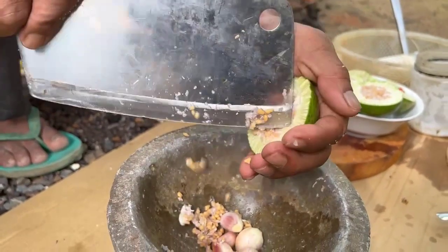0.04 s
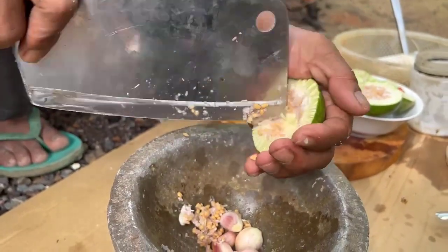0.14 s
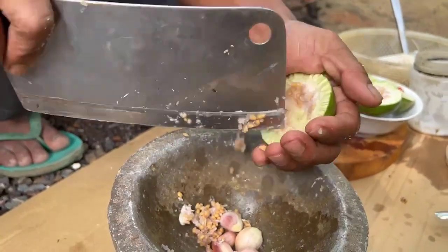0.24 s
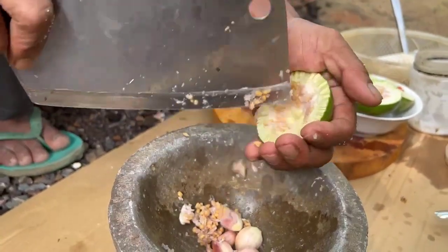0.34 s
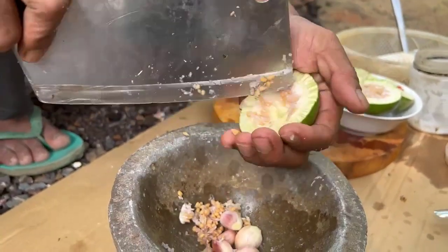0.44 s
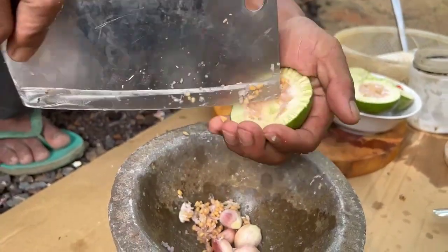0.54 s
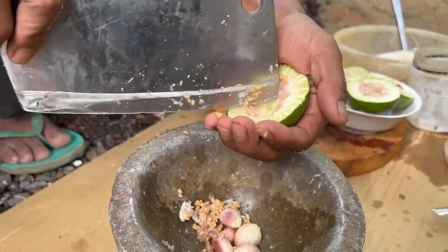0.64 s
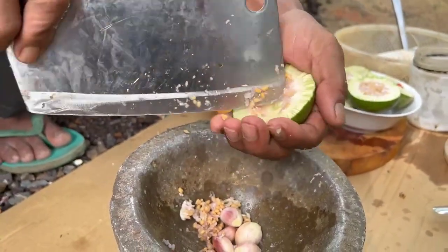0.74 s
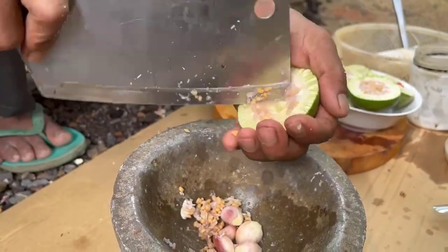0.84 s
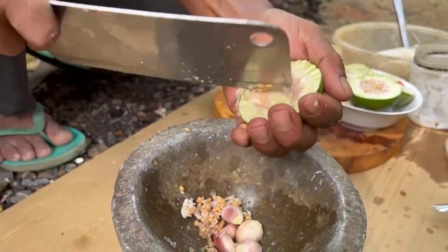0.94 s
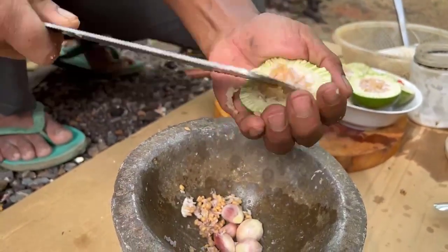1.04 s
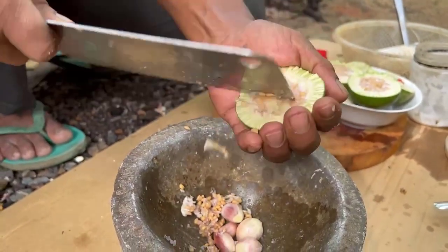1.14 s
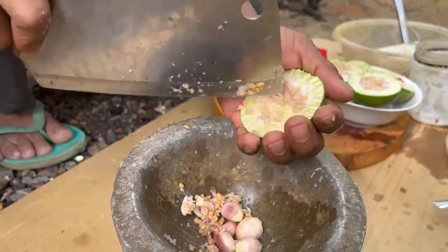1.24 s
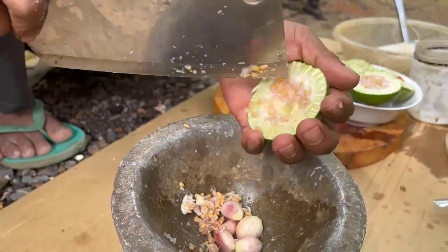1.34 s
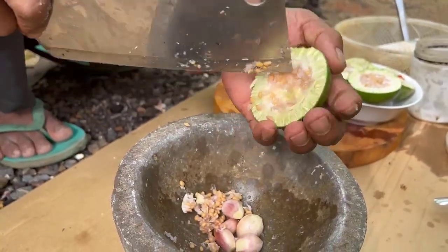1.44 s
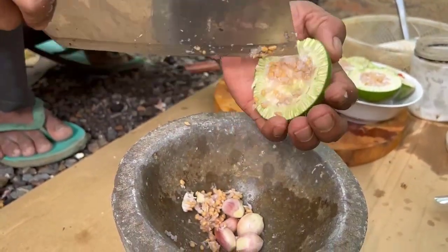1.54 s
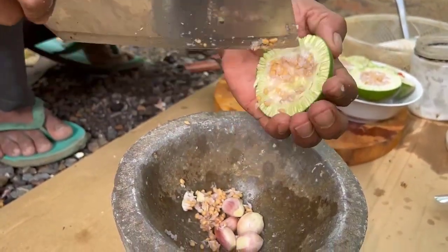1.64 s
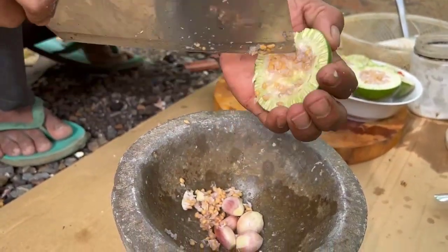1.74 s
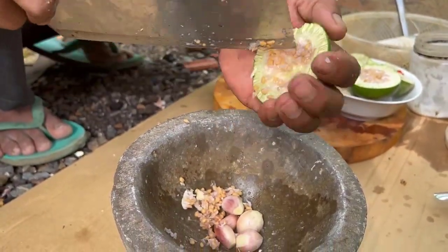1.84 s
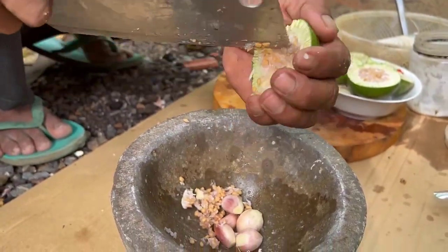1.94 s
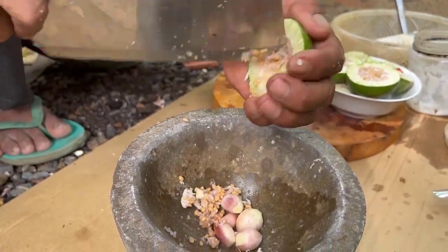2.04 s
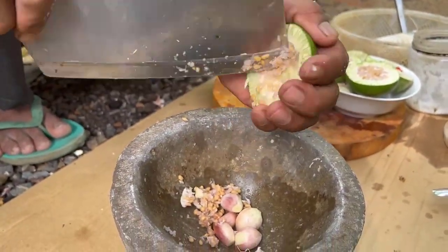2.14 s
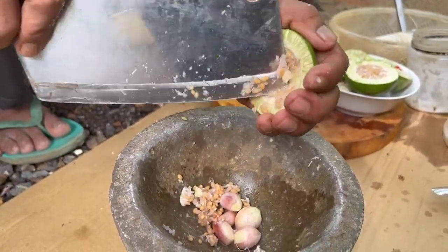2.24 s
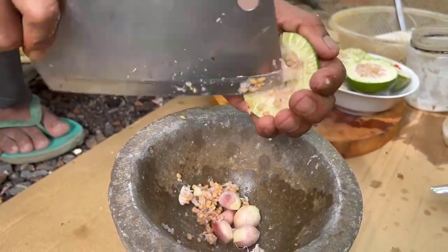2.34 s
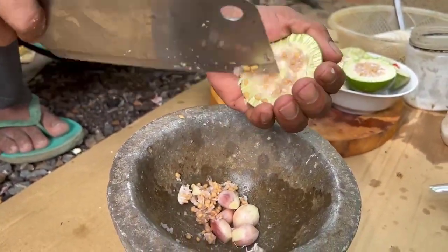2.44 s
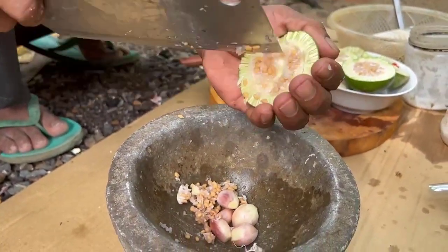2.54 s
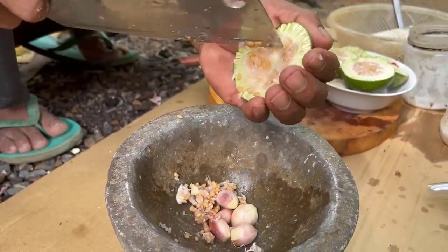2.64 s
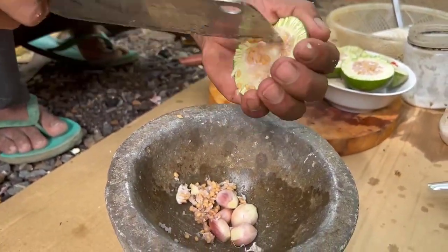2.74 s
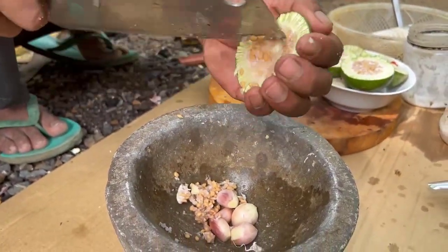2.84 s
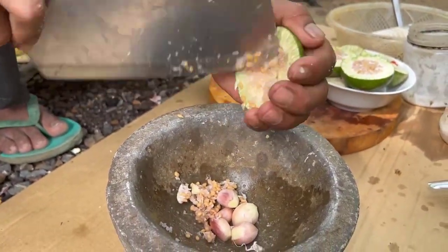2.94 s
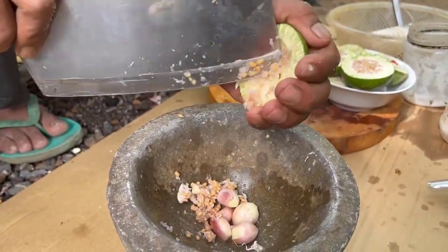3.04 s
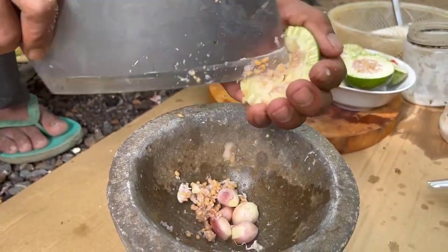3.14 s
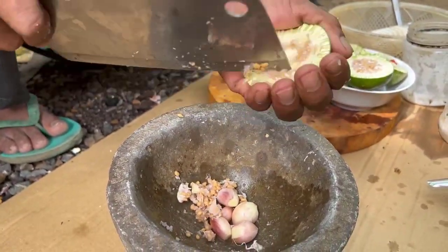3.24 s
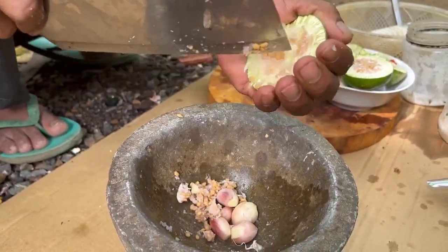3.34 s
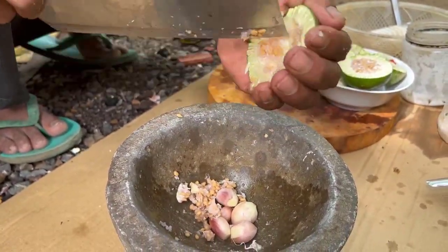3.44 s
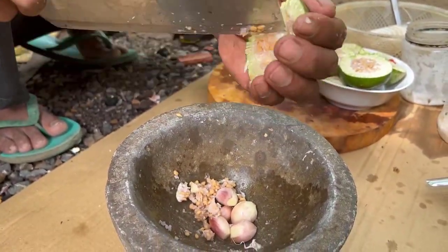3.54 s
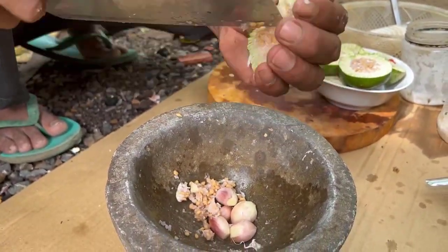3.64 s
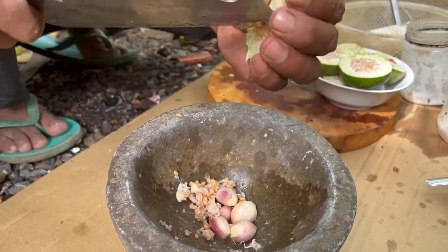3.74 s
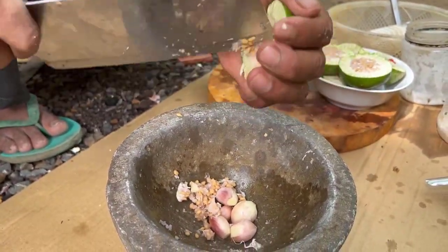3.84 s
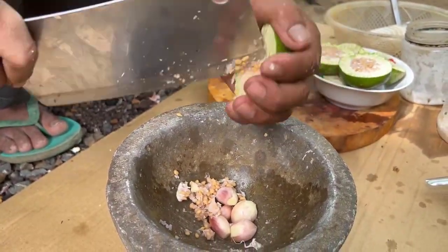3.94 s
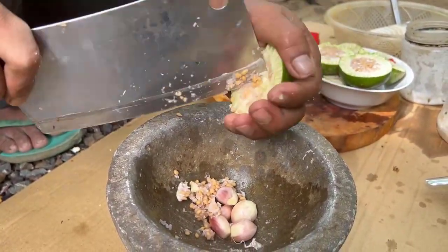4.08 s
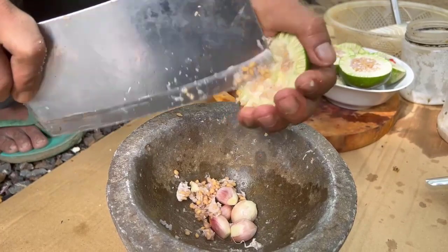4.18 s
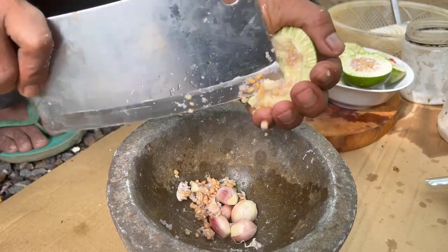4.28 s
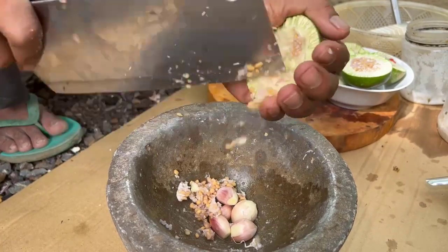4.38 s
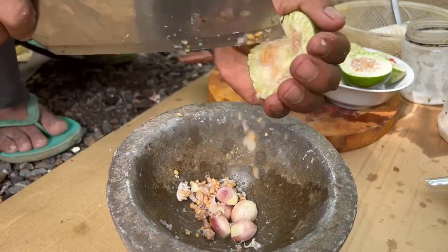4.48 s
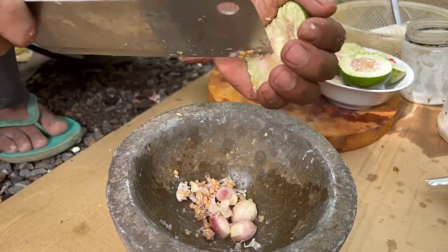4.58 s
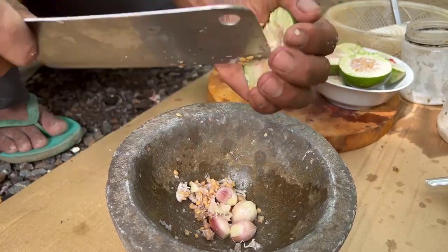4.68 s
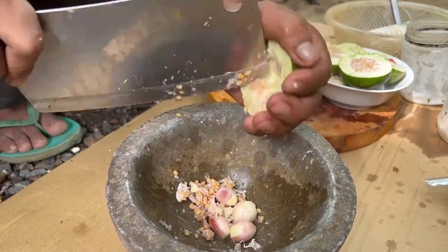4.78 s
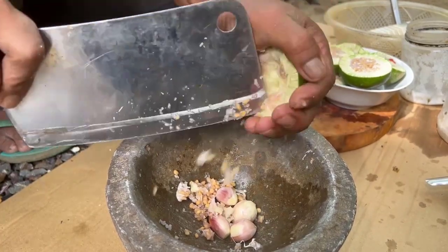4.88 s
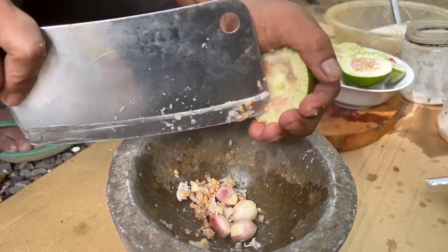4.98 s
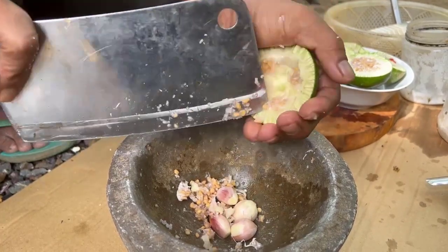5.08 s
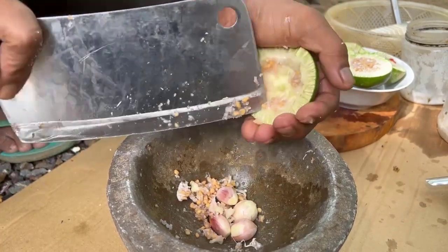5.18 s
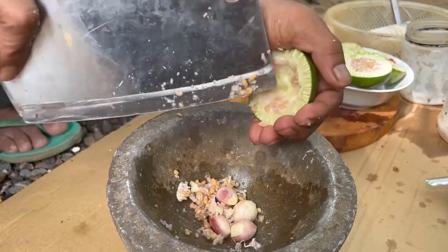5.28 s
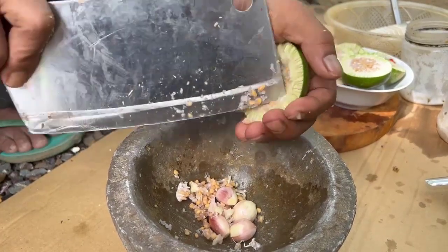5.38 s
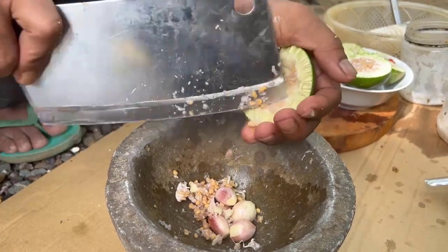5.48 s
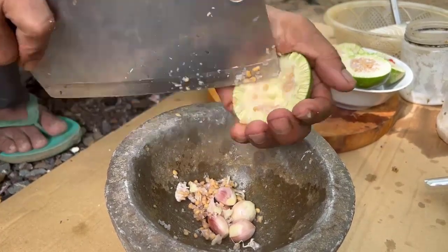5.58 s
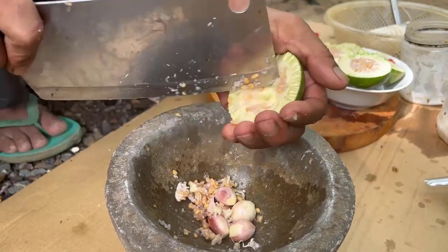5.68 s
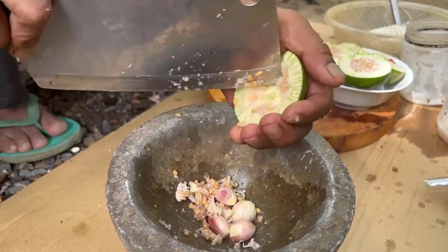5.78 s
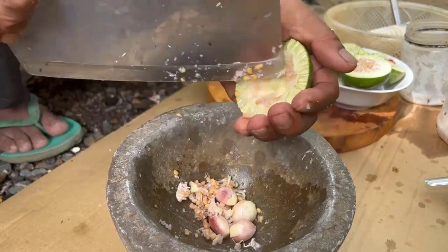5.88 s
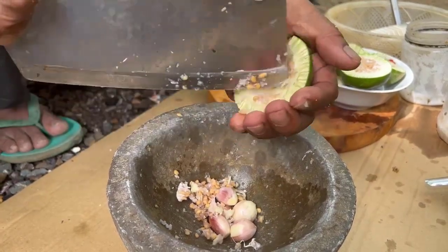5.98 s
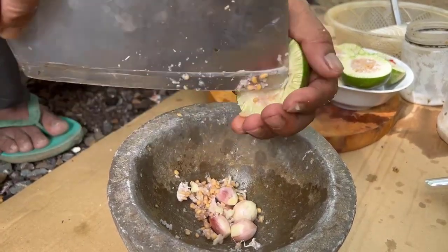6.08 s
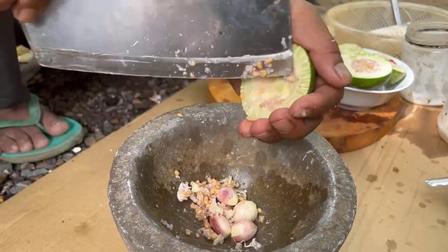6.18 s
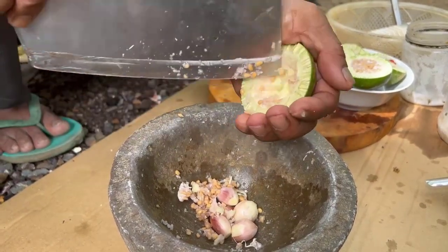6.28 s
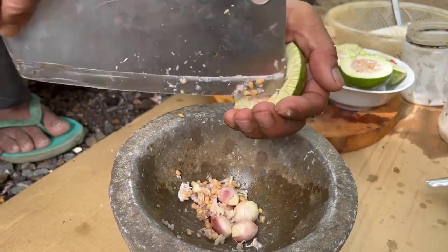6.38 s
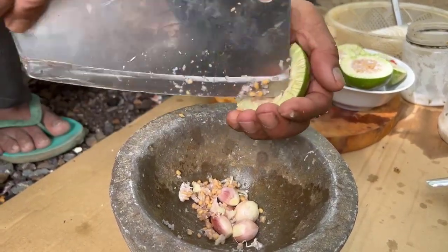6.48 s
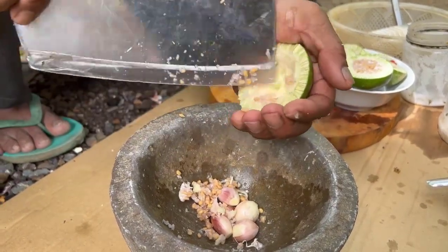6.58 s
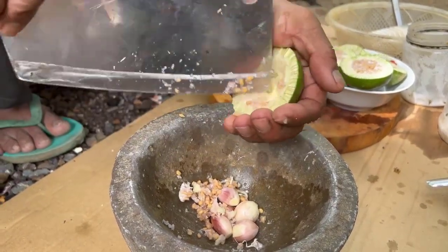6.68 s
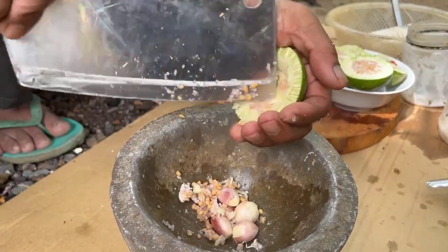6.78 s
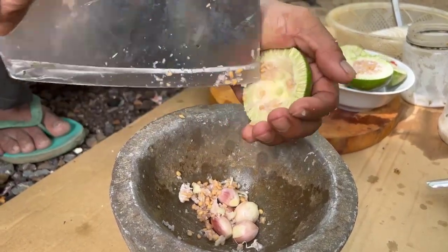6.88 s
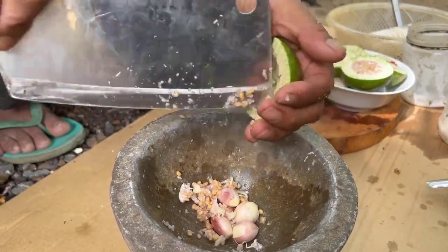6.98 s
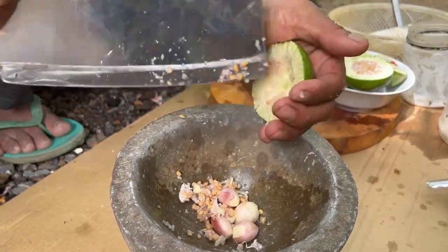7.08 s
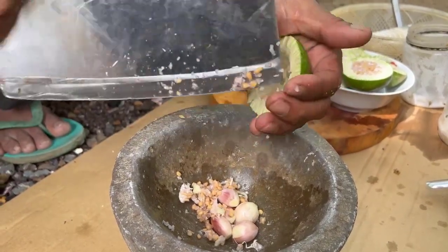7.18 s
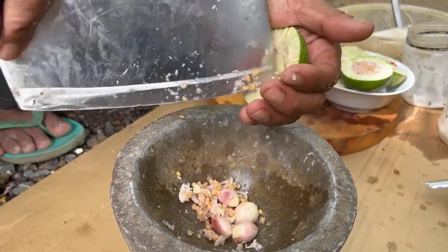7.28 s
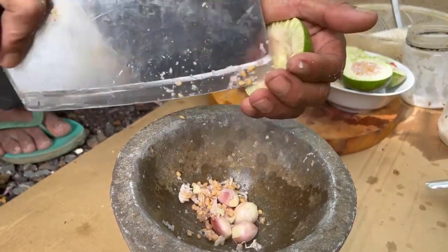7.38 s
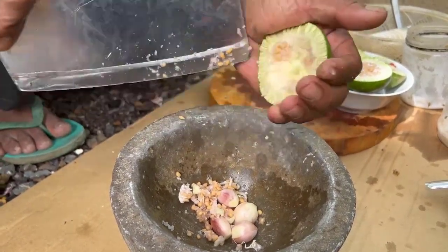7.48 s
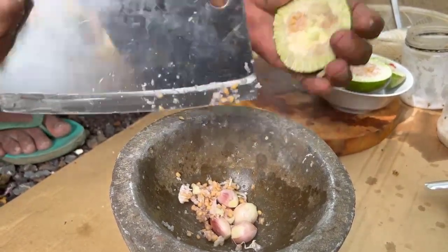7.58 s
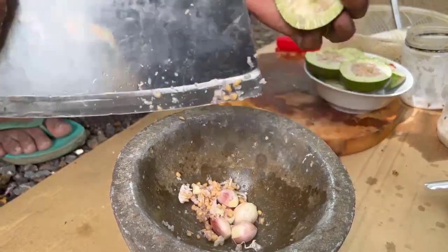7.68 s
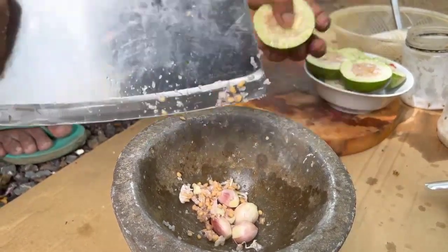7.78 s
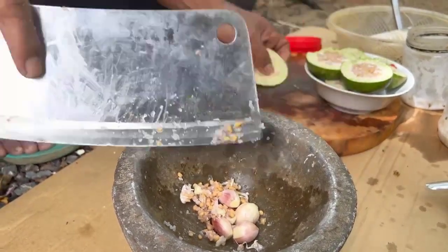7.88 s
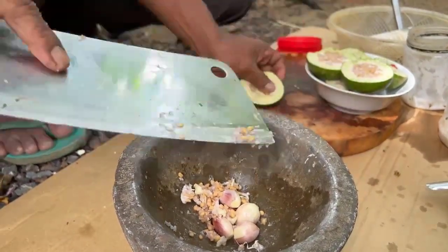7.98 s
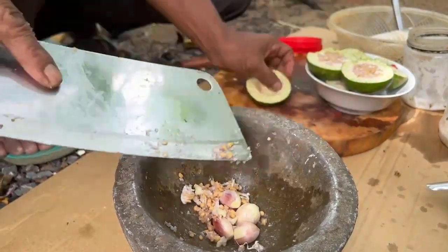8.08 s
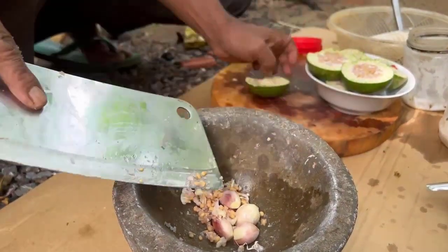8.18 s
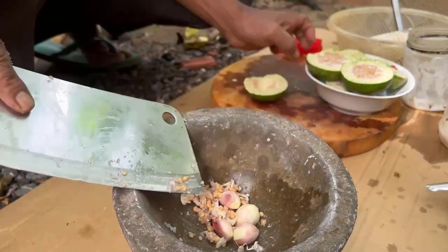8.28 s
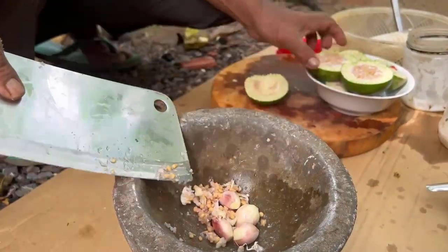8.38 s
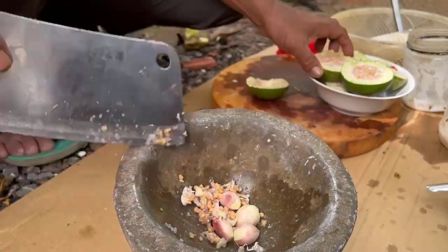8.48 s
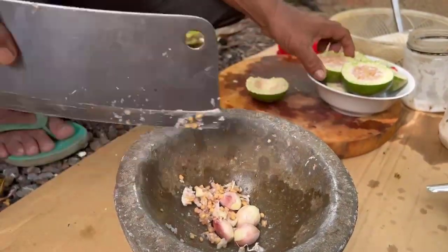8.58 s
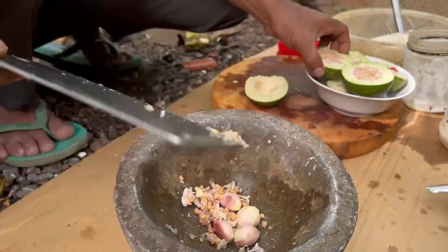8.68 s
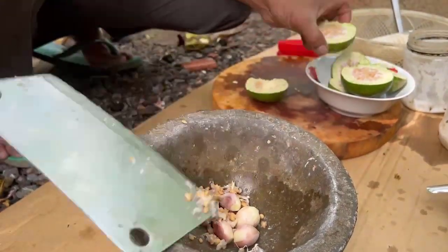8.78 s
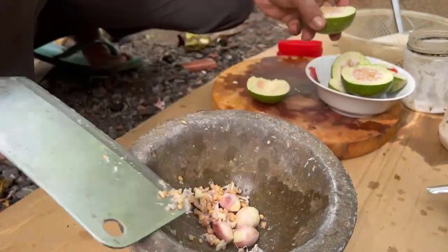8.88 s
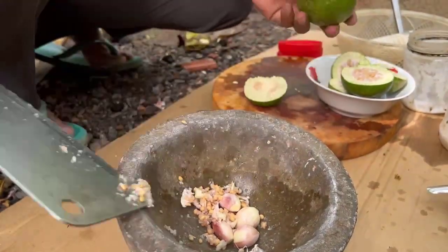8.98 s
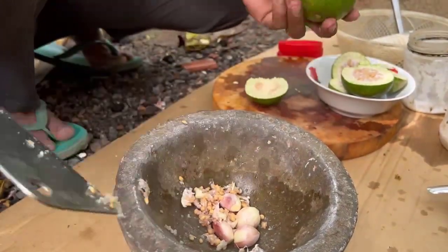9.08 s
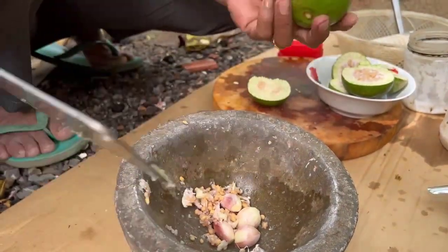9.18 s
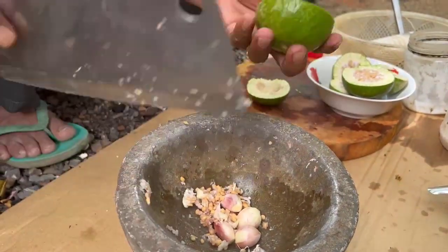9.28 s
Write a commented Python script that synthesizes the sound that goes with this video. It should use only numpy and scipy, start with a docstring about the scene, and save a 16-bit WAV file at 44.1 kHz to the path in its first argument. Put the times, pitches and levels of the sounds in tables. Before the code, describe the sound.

A steel blade shaves crisp fruit in the hand with wet crackling cuts, a piece knocks on wood, then steel scrapes stone, over faint traffic.

```python
"""A steel cleaver shaves a crisp green fruit held in the hand, outdoors and close up, over a stone mortar.
Each cut is a swell of random cell bursts and fibre cracks; in deep strokes the force also rings the blade's modes.
The rest of the fruit drops on a wooden board, a damped blow with a hollow noise tail, and then the blade is
scraped on the mortar, once on each face, by rough friction that drives the same modes. Behind this lie
traffic rumble and open-air noise, an idling engine made of partials, and one call of a far, buzzing horn."""
import sys
import numpy as np
from scipy import signal
from scipy.fft import rfft, irfft, next_fast_len
from scipy.io import wavfile
from scipy.ndimage import map_coordinates

SR = 44100
rng = np.random.default_rng(int(sys.argv[2]) if len(sys.argv) > 2 else 0)


def log_audio(samples):
    """Write samples as a 16-bit WAV file to the path given in sys.argv[1]."""
    # one column per channel
    frames = np.atleast_2d(samples).T
    # limit to full scale, then quantise
    limited = np.clip(frames, -1, 1)
    pcm = np.round(limited * 32767).astype(np.int16)
    wavfile.write(sys.argv[1], SR, pcm)


N = 411012
TIME = np.arange(N) / SR  # seconds
SHORT = np.arange(8192) / SR  # seconds within one brief sound

# All levels in the tables are relative, ahead of the gains of the mix.
# The edge slides through the flesh. Each row: start in seconds, length in seconds, crackle in dB,
# growth over the stroke in dB, body in dB relative to the crackle.
SLICES = [(0.171, 0.035, -45, -6.5, 11), (0.787, 0.028, -39, -4, -2), (0.898, 0.14, -28.5, -9, -7.5),
          (1.04, 0.2, -38.5, -5, -18), (1.869, 0.097, -46.5, -7.5, 5.5), (2.057, 0.069, -28.5, -2, -21.5),
          (2.186, 0.016, -26, 3, -7), (2.822, 0.16, -35, 14.5, -6.5), (3.168, 0.067, -40.5, -3, -10),
          (3.81, 0.033, -26, -3, -12.5), (3.866, 0.21, -34.5, -5.5, -12.5), (4.183, 0.02, -35.5, 13, 0.5),
          (4.257, 0.073, -46.5, -2, 2.5), (4.665, 0.14, -40.5, 7, -17.5), (4.836, 0.012, -25.5, 1, 0),
          (5.47, 0.095, -30, 8.5, -3), (6.116, 0.03, -38.5, -2, 1.5), (6.183, 0.05, -42.5, -4, 3.5),
          (6.262, 0.012, -33, -6, 4.5), (6.466, 0.015, -30.5, -12, -3.5), (6.554, 0.06, -29.5, 1, -4),
          (6.793, 0.05, -31.5, 0.5, -2), (7.018, 0.026, -31.5, -6, 3.5), (7.437, 0.074, -29.5, 5, -2)]
# Fibres break at once. Each row: time in seconds, level in dB.
CRACKS = [(0.486, -35.5), (0.859, -23.5), (0.884, -17), (0.964, -21.5), (0.985, -22.5), (1.050, -20),
          (2.025, -19.5), (2.068, -17), (2.200, -12), (2.217, -25), (2.858, -27.5), (2.971, -17),
          (2.984, -22), (3.025, -25), (3.193, -25), (3.24, -27), (3.697, -22.5), (3.712, -19),
          (3.872, -16.5), (3.929, -19.5), (4.008, -28), (4.221, -22), (4.567, -27.5), (4.738, -22),
          (4.765, -17.5), (4.832, -15), (4.846, -10.5), (5.117, -41), (5.238, -34), (5.392, -27),
          (5.495, -19), (5.665, -33.5), (6.196, -20.5), (6.507, -23), (6.557, -17), (6.581, -9),
          (6.688, -32.5), (6.729, -27), (6.813, -15.5), (6.961, -29.5), (7.034, -22), (7.33, -28.5),
          (7.457, -23), (7.518, -19.5)]
# Spectra of the cutting force, treble and body. Each row: frequency in Hz, density in dB per Hz.
CRACKLE_SPECTRUM = [(1120, -14), (2280, -6.5), (3280, -4), (5150, -4.5), (8450, 2.5), (11700, 4),
                    (15700, -1.5)]
FLESH_SPECTRUM = [(160, -10), (290, 10), (490, -6), (800, 7), (1180, 3), (1850, 5.5), (3100, -2)]
# The cleaver's modes. Each row: frequency in Hz, undamped width in Hz, then gain in dB with the edge in the
# fruit, with one face on stone, with the edge on stone, with the other face on stone.
BLADE_MODES = [(1214, 60, -1, -1, -17, -15), (1552, 51, -0.5, -9, -3, 2.5), (1823, 100, -6.5, -2, -8, 0.5),
               (2397, 10, -21, -5, -5, -1.5), (2650, 31, 7, -23, -6, 6.5), (3887, 19, 6.5, -1.5, 6.5, 6),
               (4200, 120, 0, -11, -6, 1.5), (4450, 34, -3, 0, -3, -11), (4940, 240, -0.5, 1.5, 0, 6.5),
               (5664, 70, -4, 2, -21, 5), (6220, 60, -8, -16, 6, -16), (6930, 33, -7, -2, -10, -10),
               (7020, 64, -6, -15, -1, 0), (8080, 100, -2, -0.5, -8, -3), (8570, 71, -24, 1, -3.5, -15)]
# The blade breaks through or stops short, and jolts against the hand.
# Each row: time in seconds, level in dB, pitch in Hz.
JOLTS = [(2.071, -8.5, 137), (4.222, -14, 196), (4.848, -6, 220), (5.55, -14, 241), (6.265, -11, 247),
         (6.56, -10, 220), (6.584, -8.5, 171), (6.799, -10.5, 262), (6.821, -4.5, 182.8), (7.036, 1.5, 719),
         (7.037, 12.5, 1110), (7.04, -3.5, 217), (7.517, -9.5, 293.5), (8.324, -7.5, 270)]
# Dry snaps of the rind. Each row: time in seconds, level in dB, centre frequency in Hz.
SNAPS = [(0.197, -18, 770), (0.884, -13.5, 1720), (1.757, -21.5, 2050), (3.874, -12.5, 1870),
         (4.223, -18.5, 2170), (4.849, -11, 1610), (5.116, -11, 1445), (6.197, -18, 1340),
         (7.037, -11, 930)]
# Steel drags on stone. Each row: start in seconds, length in seconds, grit in dB, growth over the drag in dB,
# body in dB relative to the grit, chatter pitch in Hz, tilt (-1 one face, 0 edge, 1 other face).
DRAGS = [(8.335, 0.14, -19.5, 3, -2, 4600, -0.9), (8.484, .038, -12.5, 0, -5, 8330, -0.44),
         (8.86, 0.029, -19, -24, -3.5, 3500, 1), (8.9, .06, -16.5, 2.5, -1, 4853, 0.87),
         (8.967, 0.035, -18, -2, -8, 7000, 0.49), (9.003, .035, -11, -1, -12.5, 8080, 0.22),
         (9.06, 0.021, -7.5, 0.5, -12.5, 7380, 0.3)]
# The edge lands on the stone, or catches on it. Each row: time in seconds, level in dB.
LANDINGS = [(8.316, -4.5), (8.324, -8), (8.371, -13), (8.382, -16.5), (8.847, -1.5), (8.873, -5),
            (8.949, -11)]
# Spectra of the scraping force, treble and body. Each row: frequency in Hz, density in dB per Hz.
GRIT_SPECTRUM = [(1120, -15.5), (2280, -25), (3280, -8.5), (5150, -3.5), (8450, 3.5), (11700, 6),
                 (15700, -14)]
STONE_SPECTRUM = [(125, -13), (235, 1), (365, 0.5), (490, 7.5), (740, 2), (1260, -4.5), (1850, 3),
                  (2700, -1.5), (4000, -5), (8000, -21)]
# The blade springs off the stone and a mode rings on. Each row: time in seconds, level in dB, mode in Hz.
RINGS = [(8.533, -20.5, 1480), (8.533, -28, 3892), (9.088, -20, 3910), (9.088, -23, 4440)]
# Soft knocks on the board and the dish. Each row: time in seconds, level in dB, pitch in Hz.
KNOCKS = [(7.312, -24, 1150), (8.018, 2, 715), (8.0245, -11, 790), (8.039, -9.5, 710), (8.046, -17, 805),
          (8.176, -25, 693), (8.694, -17.5, 734.6)]
# Spectrum of the board's hollow ring. Each row: frequency in Hz, density in dB per Hz.
HOLLOW_SPECTRUM = [(200, -37), (600, 8), (850, -1.5), (1400, -17), (1720, -5.5), (2300, -30), (9000, -45)]
# The horn's partials. Each row: multiple of the pitch, level in dB.
HORN_PARTIALS = [(1, -9), (5, -22), (6, -7), (7, 0), (8, 1.5), (9, -16), (12, -17), (14, -21), (15, -18)]
# The idling engine. Each row: time in seconds, rate in Hz, firing tone in dB, overtones in dB.
ENGINE = [(0, 63.95, -63, -41), (1.9, 70.6, -41, -44), (2.9, 71, -61, -41), (3.6, 65.86, -25, -44),
          (4.2, 62.1, -43, -44), (4.75, 61.95, -27, -35), (5.4, 70.1, -31, -37), (5.9, 71.04, -35, -32),
          (6.35, 71.96, -35, -29.5), (6.6, 72.2, -32.5, -29.5), (6.9, 72.5, -25, -32),
          (7.25, 73.07, -23, -32), (7.75, 73.5, -26.5, -33.5), (7.95, 72.44, -46, -32),
          (9.3, 68.58, -37, -36.5)]
# The engine's overtones. Each row: multiple of the rate, level in dB.
ENGINE_OVERTONES = [(1.5, -1), (2, -9.5), (2.5, -14.5), (3.5, -18.5), (4, -18.5), (5, -19.5)]
# The street's course. Each row: time in seconds, air in dB, change of the rumble in dB.
STREET = [(0.05, -44.5, -1.5), (5.7, -44, -1), (6.3, -42, -4), (7.6, -40.5, -8), (8.4, -44, -3),
          (9.25, -46, -2.5)]
# Spectra of the traffic and of the open air. Each row: frequency in Hz, density in dB per Hz.
RUMBLE_SPECTRUM = [(22, -49), (32, -9.5), (51, 2), (75, 8.5), (110, 3), (157, -12.5), (200, -33),
                   (233, -13.5), (272, -50), (380, -25.5), (490, -36), (840, -120)]
AIR_SPECTRUM = [(30, 15.5), (150, 19), (330, 4.5), (480, 1), (660, 3), (850, -0.5), (1600, -0.5),
                (2000, -4.5), (2700, -5.5), (3200, -8), (4400, -10), (4750, -2.5), (5200, -11), (8500, -15),
                (12000, -27), (16000, -5)]
# Likeness of the street noise at the two ports. Each row: frequency in Hz, left-right correlation.
STREET_LIKENESS = [(60, 1), (290, 0.98), (640, 0.5), (1400, 0.037), (7000, 0.41)]
# Level balance of the close work. Each row: frequency in Hz, left minus right in dB.
LEFT_BIAS = [(150, 2.5), (400, 2), (750, 3.5), (1200, 7.5), (1550, 8.5), (2000, 1), (2350, 1), (3000, 4),
             (3900, 2.5), (5200, 3.5), (5800, 3.5), (7100, 2), (8100, 1), (15000, -1.5)]
# Phase balance of the close work. Each row: frequency in Hz, left minus right in radians.
LEFT_LEAD = [(200, -1.86), (1150, 1.56), (1330, 3.5), (1550, -2), (1900, -1.67), (2300, -1.5), (2750, 1),
             (3300, 0.35), (4300, 0.1), (5000, 0.5), (5500, 0.6), (6100, 0.83), (7200, 0.85), (8600, -1.74),
             (9600, -1.5), (11500, -1.23)]
# Colour of the treble: a deep dip near 10 kHz and a steep fall above 12 kHz. Each row: frequency in Hz, gain in
# dB.
TREBLE_COLOUR = [(9000, -1), (9600, -10.5), (10200, -22.5), (10900, -14.5), (11300, -1), (11800, -8.5),
                 (12350, -21), (13000, -55), (15600, -89)]

# Attack, rise, fall and release are the times to gain or lose 20 dB; hold is steady.
SLICE_ATTACK_S, SLICE_RELEASE_S = 0.017, 0.053
CRACK_RISE_S, CRACK_HOLD_S, CRACK_FALL_S = 0.0029, 0.002, 0.013
DRAG_ATTACK_S, DRAG_RELEASE_S = 0.014, 0.035
LANDING_RISE_S, LANDING_HOLD_S, LANDING_FALL_S = 0.0016, 0.0025, 0.015
CRACK_BODY_DB, LANDING_BODY_DB = -1.5, -1  # body over that of the stroke around it
BITE_DB = -31.5  # body level at which the blade takes up half of the force
APART_DB = -24  # noise that reaches the two ports with opposite signs, against the shared noise
CHATTER_DB, CHATTER_WIDTH_HZ = -10, 1850
RING_T60_S = 0.16
ECHO_DB, ECHO_T60_S = -16, 0.027
HORN_START_S, HORN_ATTACK_S = 1.065, 0.027  # the attack is linear in amplitude
HORN_PEAK_S, HORN_DB = 1.25, -34.5
HORN_RISE_DB_PER_S, HORN_FALL_DB_PER_S = 38, 58
HORN_HZ, HORN_SAG_HZ_PER_S = 458.5, 10  # pitch at the peak, and its slope away from it on both sides
RUMBLE_DB, RUMBLE_SWING_DB = -26, 1.3
AIR_DB = 10  # added to the air's course
TOP_HZ = 15800


def cutting():
    """Random fracture excitation: cells burst in clumps, fibres crack, and deep strokes ring the damped blade."""
    clumps = unit(amp(3.2 * wobble(350))) ** 2
    stroke_power = clumps * strokes(SLICES, SLICE_ATTACK_S, SLICE_RELEASE_S)
    crack_power = bursts(CRACKS, SLICES, CRACK_RISE_S, CRACK_HOLD_S, CRACK_FALL_S, CRACK_BODY_DB)
    crackle, body = np.sqrt(stroke_power + crack_power)
    top = widened(lambda: coloured(crackle * grains(rate=4600, scatter_db=2.5, smooth=0.099), CRACKLE_SPECTRUM))
    low = widened(lambda: coloured(body * grains(rate=3900, scatter_db=1.5, smooth=0.26), FLESH_SPECTRUM))
    force = amp(1.1) * top + amp(0.5) * low
    bite = body / (body + amp(BITE_DB))  # light strokes stay dry
    gains = amp(np.array(BLADE_MODES)[:, 2] - 11.5)
    return force + blade(bite * force, gains, damping=40, roam_db=2, roam_rate=14)


def blade(force, gains, damping, roam_db, roam_rate):
    """Modal resonance: each mode is a damped resonator, widened by damping (Hz), that comes and goes."""
    sound = np.zeros_like(force)
    for (hz, width, *_), gain in zip(BLADE_MODES, gains):
        pole = np.exp((2j * np.pi * hz - np.pi * (width + damping)) / SR)
        roaming = unit(amp(roam_db * wobble(roam_rate)))  # the contact moves
        drive = force * (gain * roaming)
        feedback = [1, -2 * pole.real, abs(pole) ** 2]
        sound += np.sqrt(1 - abs(pole) ** 2) * signal.lfilter([1, -pole.real], feedback, drive)
    return sound


def grains(rate, scatter_db, smooth):
    """Shot noise: tiny fractures of uneven size at random moments, on some even friction; rms 1."""
    sizes = amp(scatter_db * np.clip(rng.standard_normal(N), -2, 2)) * rng.choice([-1, 1], N)
    fractures = unit(sizes * (rng.random(N) < rate / SR))
    return unit(fractures + smooth * rng.standard_normal(N))


def strokes(table, attack, release):
    """Sliding contact: treble and body power set in, grow or fade evenly in dB, and let go."""
    power = np.zeros((2, N))
    for s, length, db, growth_db, body_db in table:
        near = slice(max(int((s - 0.2) * SR), 0), int((s + 0.5) * SR))
        t = TIME[near] - s
        growth = growth_db * (np.clip(t / length, 0, 1) - 0.5)
        shape_db = growth + gate_db(t, attack, length, release)
        power[:, near] += amp(np.array([[db], [db + body_db]]) + shape_db) ** 2
    return power


def bursts(table, during, rise, hold, fall, extra_db):
    """Sudden release: treble and body power of breaks of one shape, with the body of the strokes around them."""
    start, length, _, _, body = np.transpose(during)[:5]
    power = np.zeros((2, N))
    for s, db in table:
        near = slice(max(int((s - 0.1) * SR), 0), int((s + 0.3) * SR))
        t = TIME[near] - s
        body_db = np.interp(s, start + length / 2, body) + extra_db
        power[:, near] += amp(np.array([[db], [db + body_db]]) + gate_db(t, rise, hold, fall)) ** 2
    return power


def gate_db(t, attack, hold, release):
    """Exponential growth and decay: level in dB of a sound that holds from t = 0."""
    return -20 * np.maximum(np.maximum(-t / attack, (t - hold) / release), 0)


def widened(source):
    """Extended source: one random force alike at both ports, and a weaker one with opposite signs."""
    mid, side = source(), amp(APART_DB) * source()
    return np.array([mid + side, mid - side])


def jolts():
    """Impulsive recoil: the blade's stops and breakthroughs are short damped tones against the hand."""
    return thuds(JOLTS, cycles=9.9, attack=0.0017)


def thuds(table, cycles, attack):
    """Heavily damped oscillation: each soft blow is one tone that loses 60 dB in so many cycles."""
    track = np.zeros(N)
    for s, db, hz in table:
        decay = amp(db - 60 * SHORT * hz / cycles)
        onset = 1 - np.exp(-SHORT / attack)
        add(track, s, decay * onset * np.sin(2 * np.pi * hz * SHORT))
    return track


def snaps():
    """Band-limited impulse: each dry snap of the rind is a decaying noise burst with one broad resonance."""
    track = np.zeros(N)
    for s, db, hz in SNAPS:
        burst = rng.standard_normal(len(SHORT))
        band = signal.butter(2, [hz / 1.8, hz * 1.44], "bandpass", fs=SR, output="sos")
        tone = signal.sosfilt(band, burst)
        add(track, s, unit(tone) * amp(db - 60 * SHORT / 0.018))
    return track


def scraping():
    """Friction excitation: steel chatters over coarse stone, and its tilt decides which modes speak."""
    pits = unit(amp(3 * wobble(520))) ** 2
    drag_power = pits * strokes([row[:5] for row in DRAGS], DRAG_ATTACK_S, DRAG_RELEASE_S)
    landing_power = bursts(LANDINGS, DRAGS, LANDING_RISE_S, LANDING_HOLD_S, LANDING_FALL_S, LANDING_BODY_DB)
    grit, body = np.sqrt(drag_power + landing_power)
    # pitch and tilt stay constant within a drag and turn between drags
    pitch, tilt = curves([(s + part * length, hz, lean)
                          for s, length, *_, hz, lean in DRAGS for part in (0, 1)])
    top = widened(lambda: coloured(grit * grains(rate=5000, scatter_db=3, smooth=0.5), GRIT_SPECTRUM))
    low = widened(lambda: coloured(body * grains(rate=2200, scatter_db=3, smooth=0.3), STONE_SPECTRUM))
    rough = top + amp(CHATTER_DB) * grit * chatter(pitch)
    force = amp(-4.0) * rough + amp(-5.5) * low
    force = sliding(force, delay=0.0011, sweep=0.1, rate=14)
    gains = [np.interp(tilt, (-1, 0, 1), amp(mode[3:])) for mode in BLADE_MODES]
    ring = blade(force, gains, damping=20, roam_db=2.5, roam_rate=30)
    bent = TIME - 0.00015 * wobble(25)  # the changing load bends the modes' pitch
    bent_ring = np.array([np.interp(bent, TIME, port) for port in ring])
    return amp(-1.5) * force + amp(-7.5) * bent_ring


def chatter(pitch):
    """Stick and slip: a rough noise band on a carrier whose pitch changes from drag to drag; rms 1."""
    slips = np.array([grains(rate=1700, scatter_db=6.5, smooth=0.21) for _ in range(2)])
    a, b = signal.sosfilt(signal.butter(2, CHATTER_WIDTH_HZ / 2, fs=SR, output="sos"), slips)
    phase = 2 * np.pi * np.cumsum(pitch) / SR
    return unit(a * np.cos(phase) + b * np.sin(phase))


def sliding(x, delay, sweep, rate):
    """Comb interference: an echo from the blade's far edge changes its delay as the contact slides."""
    lag = delay * (1 + sweep * wobble(rate))
    return np.array([port + np.interp(TIME - lag, TIME, port) / 2 for port in x]) / np.hypot(1, 0.5)


def lifting():
    """Free vibration: off the stone nothing damps the blade, and its modes sing briefly and unevenly."""
    track = np.zeros(N)
    for s, db, hz in RINGS:
        waver = wobble(60)[:len(SHORT)] / 2  # radians
        add(track, s, amp(db - 60 * SHORT / RING_T60_S) * np.sin(2 * np.pi * hz * SHORT + waver))
    return track


def board():
    """Impact response: the fruit lands and bounces, and the board answers with a short hollow ring."""
    blows = thuds(KNOCKS, cycles=7.3, attack=0.0022)
    hollow = coloured(rng.standard_normal(N), HOLLOW_SPECTRUM)
    tail = np.zeros(N)
    for s, db, _ in KNOCKS:
        add(tail, s, amp(db - 12.5 - 60 * SHORT / 0.071))
    return amp(15.0) * blows + hollow * tail


def reflections(x, t60, gap):
    """Diffuse reverberation: a decaying scattered tail of energy 1, unrelated at the two ports."""
    tail = rng.standard_normal((2, len(SHORT))) * amp(-60 * SHORT / t60) * (SHORT > gap)
    return through(x, tail / np.linalg.norm(tail[0]))


def horn():
    """Harmonic series: a far horn, strongest near 3.5 kHz, swells, flutters and dies away in the street."""
    t = TIME - HORN_PEAK_S
    pitch = HORN_HZ - HORN_SAG_HZ_PER_S * np.abs(t)
    swell = amp(-np.maximum(-t * HORN_RISE_DB_PER_S, t * HORN_FALL_DB_PER_S))
    onset = np.clip((TIME - HORN_START_S) / HORN_ATTACK_S, 0, 1)
    waver = 1 + 0.004 * wobble(130)
    flutter = unit(amp(2.5 * wobble(95)))
    call = onset * amp(HORN_DB) * swell * flutter * harmonics(pitch * waver, HORN_PARTIALS)
    return call + amp(-5) * reflections(call, t60=0.5, gap=0.01)


def harmonics(pitch, tone):
    """Fourier synthesis: (multiple, dB) partials on a pitch curve; a 0 dB partial has rms 1."""
    phase = 2 * np.pi * np.cumsum(pitch) / SR
    return np.sqrt(2) * sum(amp(db) * np.sin(k * phase + rng.uniform(0, 2 * np.pi)) for k, db in tone)


def engine():
    """Periodic combustion: a firing tone and overtones follow one unevenly idling rate."""
    rate, firing_db, overtones_db = curves(ENGINE)
    rate = rate * (1 + 0.004 * wobble(11))
    swing = amp(1.6 * wobble(3.5))
    firing = amp(firing_db) * harmonics(rate, [(0.99, 0.017)])
    overtones = amp(overtones_db) * harmonics(rate, ENGINE_OVERTONES)
    return swing * (firing + overtones)


def street():
    """Superposed distant noise: the traffic's rumble and the open air swing slowly in level."""
    air_db, traffic_db = curves(STREET)
    rumble_db = RUMBLE_DB + traffic_db + RUMBLE_SWING_DB * wobble(6.5)
    rumble = amp(rumble_db) * street_noise(RUMBLE_SPECTRUM)
    air = amp(air_db + AIR_DB + wobble(4.7)) * street_noise(AIR_SPECTRUM)
    return rumble + air


def street_noise(spectrum):
    """Partial coherence: stereo noise of rms 1 whose likeness at the two ports depends on frequency."""
    def split(hz):
        turn = np.arccos(np.clip(along(STREET_LIKENESS, hz), -1, 1)) / 2
        return amp(along(spectrum, hz)) * [np.cos(turn), np.sin(turn)]
    mid, side = filtered(rng.standard_normal((2, N)), split)
    return unit(np.array([mid + side, mid - side]))


def amp(db):
    """Logarithmic level: decibels to gain."""
    return 10 ** (np.asarray(db) / 20)


def unit(x):
    """Mean-square level: scale to rms 1."""
    return x / np.sqrt(np.mean(x ** 2) + 1e-20)


def along(points, hz):
    """Logarithmic frequency: (Hz, value) points read on a log axis."""
    f, v = np.transpose(points)
    return np.interp(np.log(hz + 1), np.log(f + 1), v)


def curves(rows):
    """Linear interpolation: one value per sample for each column after the time."""
    s, *cols = np.transpose(rows)
    return [np.interp(TIME, s, c) for c in cols]


def wobble(rate):
    """Slow random modulation: a smooth curve through rate random knots a second."""
    coarse_time = TIME[::20]
    knots = rng.standard_normal(int(N * rate / SR) + 4)
    return np.interp(TIME, coarse_time, map_coordinates(knots, [coarse_time * rate]))


def filtered(x, response):
    """Linear filtering: the spectrum of x times a response of frequency."""
    m = next_fast_len(N + SR // 2)
    return irfft(rfft(x, m) * response(np.fft.rfftfreq(m, 1 / SR)), m)[..., :N]


def causal(spectrum):
    """Minimum phase: the impulse response of a spectrum, by folding its cepstrum."""
    n = len(SHORT)
    cepstrum = irfft(np.log(amp(along(spectrum, np.fft.rfftfreq(n, 1 / SR)))))
    cepstrum[1:n // 2] *= 2
    cepstrum[n // 2 + 1:] = 0
    return irfft(np.exp(rfft(cepstrum)))


def through(x, response):
    """Convolution: x passed through an impulse response."""
    return signal.oaconvolve(np.atleast_2d(x), np.atleast_2d(response), axes=1)[:, :N]


def coloured(x, spectrum):
    """Spectral shaping: a force takes on a spectrum and keeps the power of white noise."""
    response = causal(spectrum)
    return through(x, response / np.linalg.norm(response))[0]


def add(track, s, sound):
    """Superposition: mix a sound in at s seconds."""
    part = track[max(round(s * SR), 0):][:len(sound)]
    part += sound[:len(part)]


def scene():
    """Interaural difference: the work sits a little to the left, with faint echoes from mortar and ground."""
    near = cutting() + scraping() + lifting() + board() + snaps()
    bright = filtered(near, lambda hz: amp(along([(300, -3), (1200, 14.5)], hz)))  # echoes favour treble
    near = near + amp(ECHO_DB) * reflections(bright, t60=ECHO_T60_S, gap=0.001393)
    near = near + jolts()
    ports = np.array([[0.5], [-0.5]])  # left, right: half of each difference
    near = filtered(near, lambda hz: amp(ports * along(LEFT_BIAS, hz))
                    * np.exp(1j * ports * along(LEFT_LEAD, hz)))
    return near + horn() + engine() + street()


def record(dry):
    """Transduction: a dipped and falling treble, soft overload on the hardest blows, and the band limit."""
    sound = through(dry, causal(TREBLE_COLOUR))
    sound = sound / (1 + np.abs(sound) ** 6) ** (1 / 6)
    return filtered(sound, lambda hz: hz < TOP_HZ)


dry = scene()
out = record(dry)
log_audio(out)
```